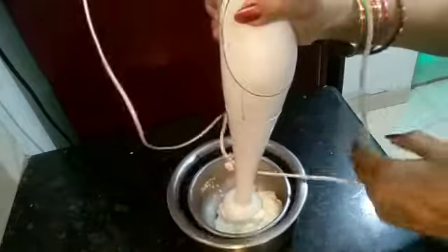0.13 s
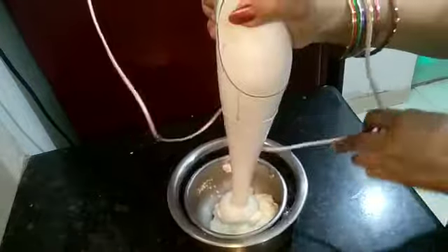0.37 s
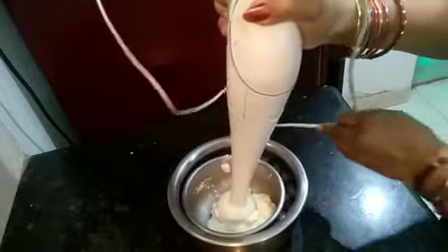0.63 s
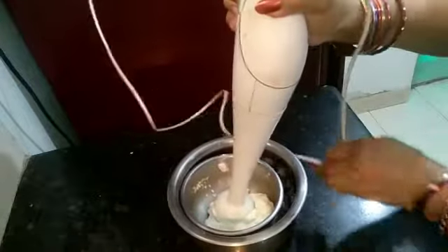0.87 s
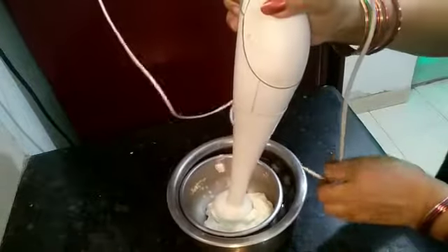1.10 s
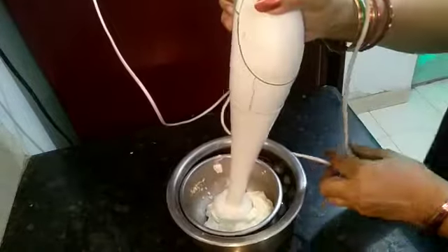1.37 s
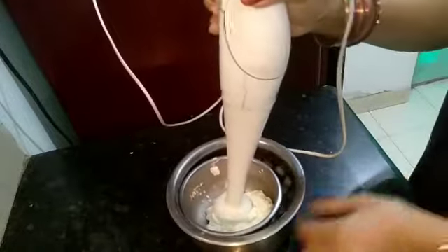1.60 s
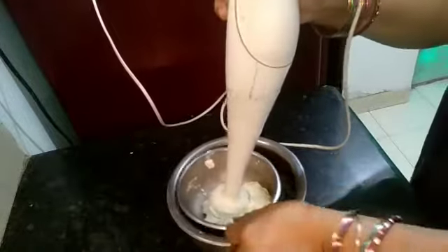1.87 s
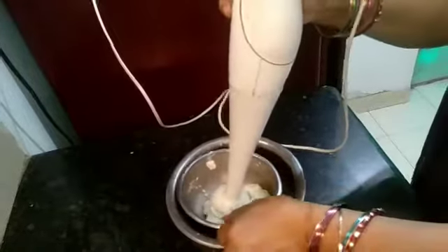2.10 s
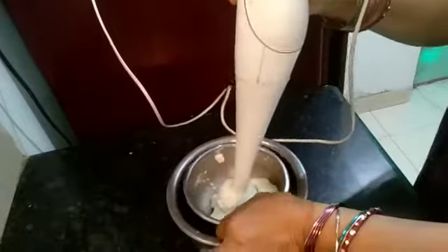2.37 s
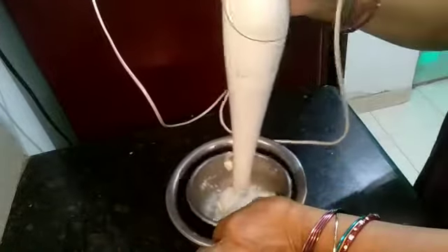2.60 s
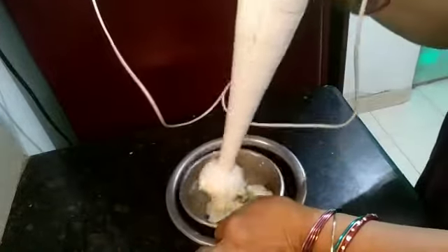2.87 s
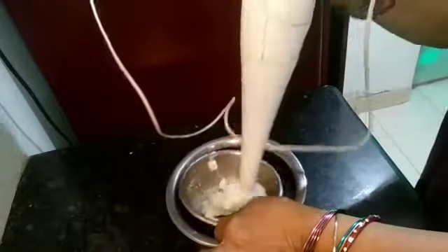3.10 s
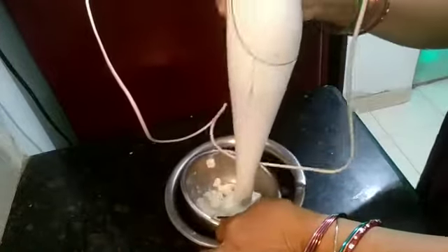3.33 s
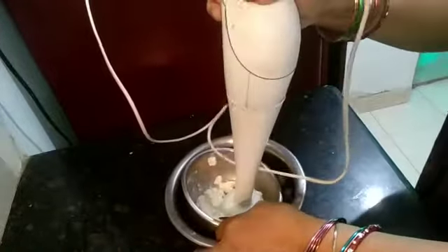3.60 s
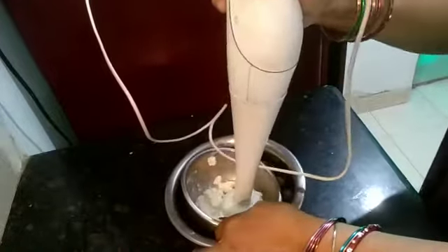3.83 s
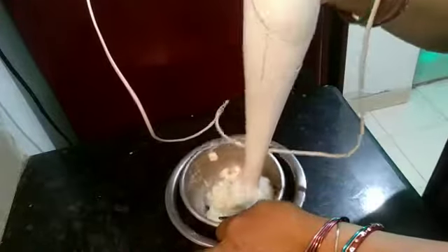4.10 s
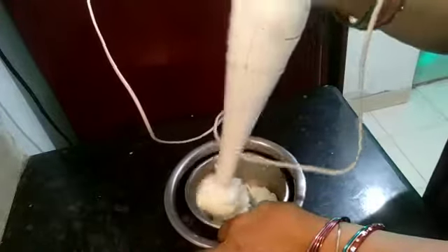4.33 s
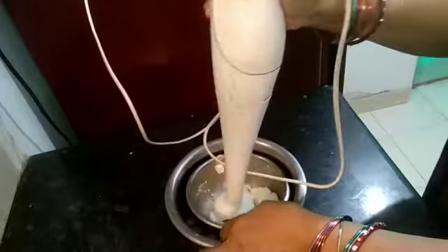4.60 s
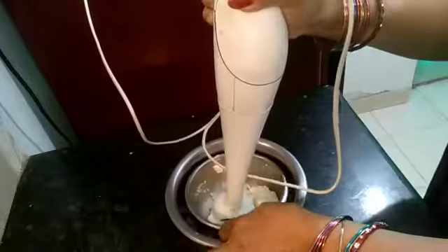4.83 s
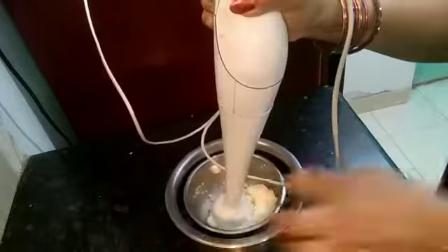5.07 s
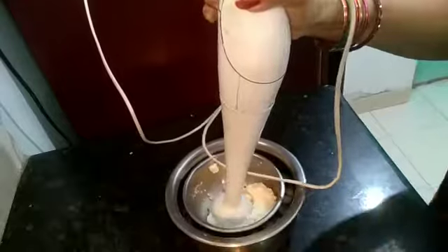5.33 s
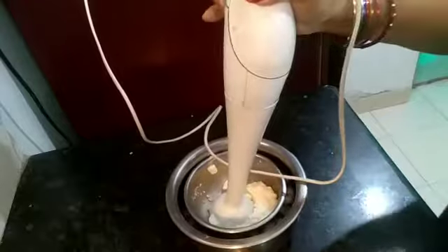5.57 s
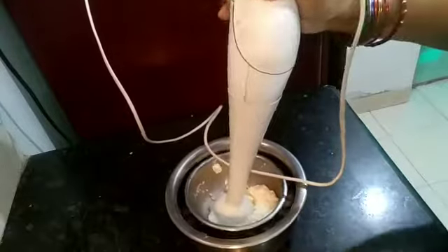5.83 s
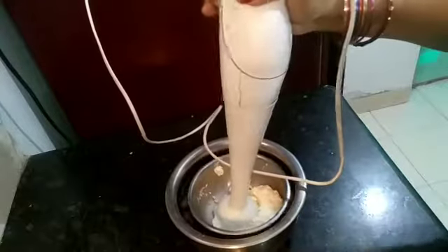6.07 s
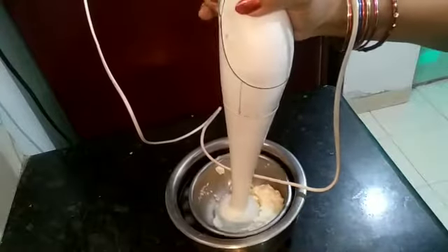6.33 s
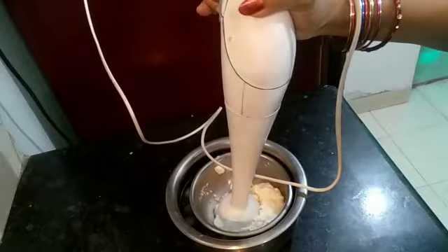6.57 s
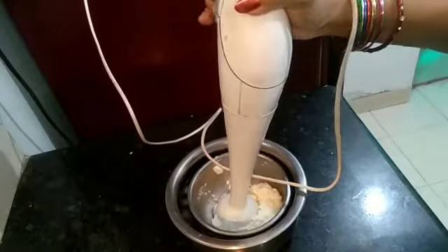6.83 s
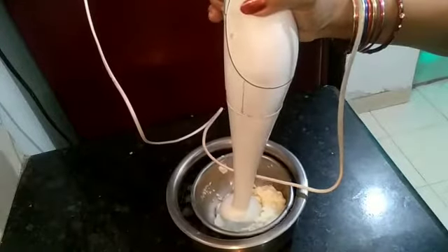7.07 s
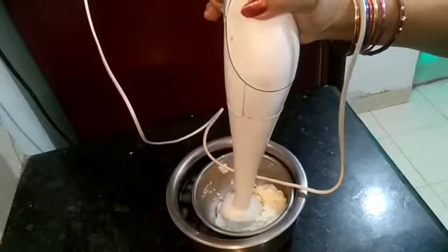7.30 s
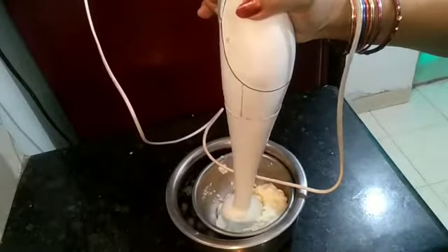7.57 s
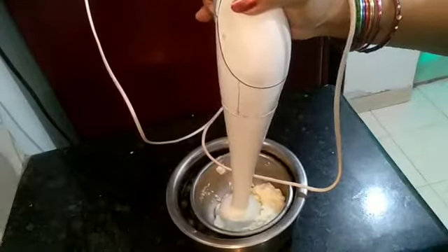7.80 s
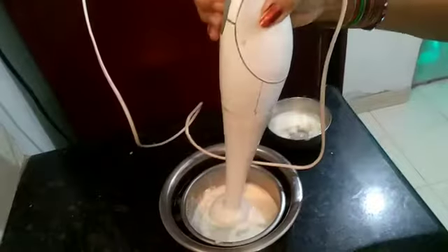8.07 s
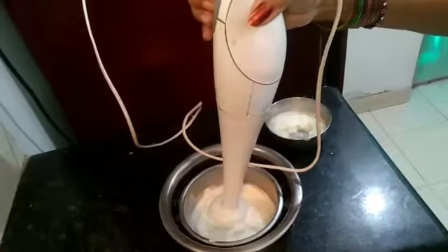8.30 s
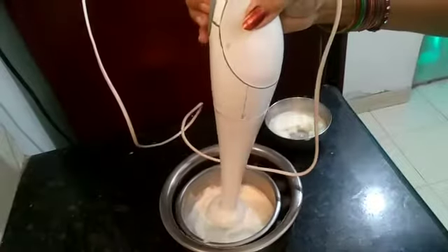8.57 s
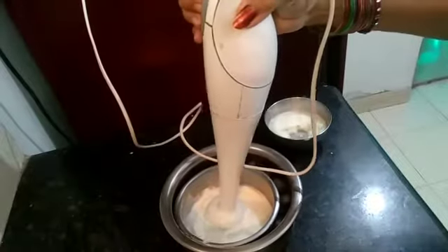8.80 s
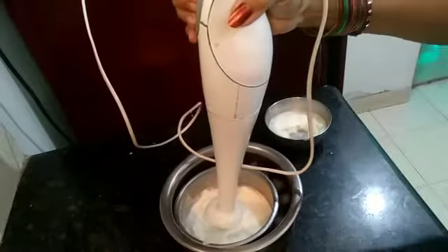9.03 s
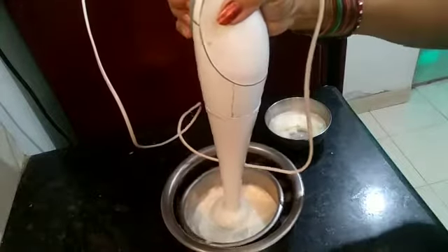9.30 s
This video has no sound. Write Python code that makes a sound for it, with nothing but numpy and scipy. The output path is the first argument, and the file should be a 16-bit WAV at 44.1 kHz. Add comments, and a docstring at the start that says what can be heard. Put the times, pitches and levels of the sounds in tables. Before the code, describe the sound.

In a small, hard-walled kitchen, a handheld blender runs in a long opening burst, then several bursts of about half a second, each snapping up to a buzzing whine and gliding down. Between them its head knocks and rattles in a steel bowl, hands and cord rustle, and bangles clink. The last burst is weaker and lower. Close stereo microphone, left side brighter, faint low room hum.

```python
"""Hand blender in short bursts

A hand-held blender in a steel bowl on a kitchen counter: shaft orders and rush follow a speed that rises, dips, runs down.
Contacts crack, rattle and excite damped bowl modes; glass bangles ring in sine modes; sliding is grainy noise.
Below lie coloured room noise and two wavering low tones. Two microphone ports hear it, the left one brighter.
"""
import sys
import numpy as np
from scipy import signal
from scipy.fft import rfft, irfft, next_fast_len
from scipy.io import wavfile
from scipy.ndimage import uniform_filter1d, map_coordinates

SR = 44100
rng = np.random.default_rng(int(sys.argv[2]) if len(sys.argv) > 2 else 0)


def transcribe(u):
    """Save the signal u as a 16-bit wav file named by the first command-line argument.

    u: samples, shape (n,) or (channels, n), limited to [-1, 1]; the rate is SR.
    q: integer samples, one column per channel.
    """
    v = np.clip(np.atleast_2d(u).T, -1, 1)
    q = np.round(v * 32767).astype(np.int16)
    wavfile.write(sys.argv[1], SR, q)


def undo_db(level):
    """Turn decibels back into plain size, where 20 dB means ten times bigger."""
    steps = np.asarray(level, float) / 20
    return 10 ** steps


N = 415422

# motor bursts: on/s, off/s, top speed/Hz, slow share of speed gain/1, run-down time constant/s
BURSTS = [(.093, 1.248, 218.3, 0.09, 0.12), (3.343, 3.814, 233.2, 0.11, .135),
          (4.602, 5.383, 238.2, .19, 0.13), (5.904, 6.43, 235.4, .05, .14), (6.926, 7.34, 238.4, 0.06, .14),
          (9.138, 9.502, 122.2, 0.06, .13)]
# left-right likeness of near sources: f/Hz, likeness/1
NEAR_LIKENESS = [(60, 0.67), (240, 1), (950, 0.31), (3770, 0.54), (15000, -0.004)]
# left-right likeness of room and rustle: f/Hz, likeness/1
FAR_LIKENESS = [(60, 1), (240, 0.85), (950, -0.19), (3770, 0.18), (15000, -2.3)]
# colour of a hard contact: f/Hz, level/dB
CRACK_COLOUR = [(350, -47.5), (600, -16.5), (1110, -12.5), (1490, -1), (2120, -15), (2650, 1.5), (10600, 0),
                (14500, -2), (16000, -36.5)]


def unit(x):
    """Scaled to rms 1."""
    return x / np.sqrt(np.mean(x ** 2) + 1e-20)


def along(points, hz):
    """(Hz, value) points interpolated on a log frequency axis."""
    f, v = np.transpose(points)
    return np.interp(np.log(hz + 1), np.log(f + 1), v)


def wobble(rate, channels=1):
    """Smooth random curves, rate knots a second."""
    knots = rng.standard_normal((channels, 4000))
    return np.array([map_coordinates(k, [np.arange(N) * rate / SR]) for k in knots])


def filtered(x, response):
    """x times a response of frequency."""
    m = next_fast_len(N + SR // 2)
    return irfft(rfft(x, m) * response(np.fft.rfftfreq(m, 1 / SR)), m)[..., :N]


def pair(alike):
    """White stereo noise of a given left-right likeness, mixed from mid and side."""
    turn = lambda hz: np.arccos(np.clip(along(alike, hz), -1, 1)) / 2
    noise = rng.standard_normal((2, N))
    mid, side = filtered(noise, lambda hz: [np.cos(turn(hz)), np.sin(turn(hz))])
    return np.array([mid + side, mid - side])


def coloured(x, spectrum):
    """x with the colour of (Hz, dB) points, rms 1."""
    return unit(filtered(x, lambda hz: undo_db(along(spectrum, hz))))


def resonance(f, centre_hz, width_hz):
    """Bell of height 1 with the given width at half height."""
    return 1 / (1 + (2 * (f - centre_hz) / width_hz) ** 2)


def notched_rippled(x, ripple_db, notch_db):
    """A moving notch from the counter's reflection, and random slowly changing ripples across the spectrum."""
    # notch path: t/s, f/Hz
    notch_path = [(.1, 8600), (.4, 8400), (1.3, 8400), (3.4, 9750), (4.7, 9300), (5.4, 9783), (6, 9100),
                  (6.4, 9597), (7.3, 9310)]
    hz, t, z = signal.stft(x, SR, nperseg=1024)
    field = uniform_filter1d(rng.standard_normal(z.shape), size=5, axis=1)
    field = uniform_filter1d(field, size=12, axis=2)
    notch_hz = np.interp(t, *np.transpose(notch_path))
    notch = notch_db * resonance(hz[:, None], notch_hz, 900)
    return signal.istft(z * undo_db(ripple_db * unit(field) - notch), SR, nperseg=1024)[1][:, :N]


def speed():
    """Shaft speed/Hz: fast and slow rise, load dips, exponential run-down; also burst index, age/s, time since off/s."""
    # blades bog down in thick food: t/s, speed lost/Hz, time to lowest speed/s
    bogs = [(0.984, 31, .045), (5.064, 7.7, 0.044), (6.205, 6.91, 0.0306)]
    spin_up_s, creep_s = .04, .2  # time constants
    t = np.arange(N) / SR
    on, off, top, slow, coast_s = np.transpose(BURSTS)
    which = np.clip(np.searchsorted(on, t) - 1, 0, None)
    age = np.clip(t - on[which], 0, None)
    driven = np.minimum(age, (off - on)[which])
    coasting = np.clip(t - off[which], 0, None)
    fast_lack = (1 - slow[which]) * np.exp(-driven / spin_up_s)
    slow_lack = slow[which] * np.exp(-driven / creep_s)
    hz = top[which] * (1 - fast_lack - slow_lack)
    for s, lost, deepest in bogs:
        u = np.clip((t - coasting - s) / deepest, 0, None)
        hz = hz - lost * u * np.exp(1 - u)
    return np.clip(hz * np.exp(-coasting / coast_s[which]), 1, None), which, age, coasting


def motor():
    """Shaft orders, throbbing with the mains torque, over a rush that bursts once a turn; a rattle as it coasts."""
    # voice per burst: rush/dB, brightness/dB, first order/dB, second order/dB, upper orders/dB
    voice = [(-31, 2.5, -34.5, -36, -39.5), (-30.5, 3, -33.5, -31, -31), (-31.5, 2, -33.5, -36.5, -34.5),
             (-31, 4.5, -31.5, -34.5, -30), (-30, 2, -32, -34, -33), (-39, -2, -40, -36.5, -47.5)]
    # roughness per burst: once-a-turn beat/dB, mains throb/1, coasting rattle/dB (all relative)
    rough = [(3, 0, -68), (3.5, 0.13, -46), (2.5, 0.03, -41), (3.5, 0, -35.5), (4, 0, -37), (.5, .07, -95)]
    # shaft orders: multiple/1, level/dB
    orders = [(1, 1), (2, -8.5), (3, -6.5), (4, -9), (5, -13), (6, -8.5), (8, -13.5)]
    # first order against speed: speed/Hz, level/dB
    first_curve = [(60, -54), (105, -15), (160, -4), (198, 1.5), (225, -2.5), (238, 1.5)]
    # second and upper orders against speed: speed/Hz, level/dB
    upper_curve = [(60, -47), (120, -9), (180, -9.5), (200, -4), (222, -3.5), (238, 1)]
    # rush against speed: speed/Hz, level/dB
    flow = [(25, -52), (60, -29.5), (100, -15.5), (140, -6.5), (200, -2), (238, 0)]
    # single orders swell or sink as the blades bite: t/s, order/1, level/dB, half length/s
    bites = [(0.918, 4, 16.5, 0.067), (1.185, 4, 10, 0.032), (3.427, 6, 11.5, .04), (3.44, 5, 7, .05),
             (3.762, 4, 4, .08), (5.322, 1, 3, 0.076), (5.32, 6, 3.5, 0.11), (6.139, 6, 4.5, 0.077),
             (6.24, 1, -1.5, .03), (6.392, 6, 7.5, 0.063), (7.289, 1, 2.5, .07), (7.239, 6, 2, 0.088)]
    # phase lead of the left port: f/Hz, lead/rad
    lead = [(230, -0.41), (460, -0.34), (700, -1.3), (930, 1.87), (1400, -0.98)]
    # colour of brush, fan and blade rush: f/Hz, level/dB
    rush_colour = [(150, -29), (250, -18), (273, -19), (348, -25.5), (444, -20.5), (510, -20.5),
                   (1820, -9.5), (3280, -11), (3840, -10.5), (4650, -12), (5070, -16.5), (5730, -7),
                   (10500, -7), (14200, -18.5), (16000, -43)]
    # body and bowl resonances: f/Hz, width/Hz, level/dB
    body_modes = [(340, 67, 4.5), (559, 53, 11.5), (970, 96, 7.5), (1412, 13, 5.5), (1570, 59, 1.5),
                  (1860, 150, 3.5), (3044, 280, -4.5), (3720, 280, 2.5), (5070, 110, -6.5),
                  (6440, 390, 0.5), (7190, 230, 2)]
    mains_hz, full_hz, bright_db_per_oct = 50, 230, 4
    wake_db, wake_s, rush_wake_db, rush_wake_s = 23, 0.047, 10, 0.028  # starts this far down, recovers
    unload_db, unload_upper_db, unload_s = 6, 11, 0.011  # whine drop without current

    hz, which, age, coasting = speed()
    t = np.arange(N) / SR
    rush_db, bright_db, first_db, second_db, upper_db = np.array(voice)[which].T
    wake = wake_db * np.exp(-age / wake_s)
    unload = 1 - np.exp(-coasting / unload_s)
    rush_db = rush_db + along(flow, hz) - rush_wake_db * np.exp(-age / rush_wake_s)
    bright_db = bright_db + bright_db_per_oct * np.maximum(np.log2(hz / full_hz), -1)
    upper = along(upper_curve, hz) - wake - unload_upper_db * unload
    first = along(first_curve, hz) - wake - unload_db * unload
    level = {1: first_db + first, 2: second_db + upper}

    gate = uniform_filter1d(1. * (hz > 20), size=1300)
    turn = 2 * np.pi * np.cumsum(hz * (1 + .0012 * wobble(40)[0])) / SR
    on = np.array([uniform_filter1d(1. * ((t > a) & (t < b)), size=1300) for a, b, *_ in BURSTS])
    off = np.array(BURSTS)[:, 1]
    beat_db, depth, coast_db = np.transpose(rough)
    beat = 3.0 + (beat_db - 4.5) @ on
    mains = depth @ on * np.cos(4 * np.pi * mains_hz * t)  # torque at twice the mains

    whine = np.zeros((2, N))
    for k, db in orders:
        half_lead = along(lead, k * 230) / 2 * np.array([[1], [-1]])
        flutter_db = .5 * wobble(7) + .25 * wobble(10, channels=2)
        unsteady = undo_db(min(k - .6, 3) * flutter_db)  # higher orders flutter more
        bite_db = sum(g * np.exp(-((t - s) / half_s) ** 2) for s, order, g, half_s in bites if round(order) == k)
        strength = undo_db(db + bite_db + level.get(k, upper_db + upper)) * unsteady
        throb = 1 + (k - .7) * mains
        whine += strength * throb * np.sqrt(2) * np.cos(k * turn + half_lead + 0.94 * k * (k > 1))

    body = lambda f: undo_db(sum(db * resonance(f, c, w) for c, w, db in body_modes))
    # blades and brushes strike once a turn, at random strength
    strike = rng.standard_normal(8000)[(turn / (2 * np.pi)).astype(int)]
    turn_db = (beat + 0.3 * strike) * np.cos(turn) + 1.3 * np.cos(2 * turn)
    gated = pair(NEAR_LIKENESS) * undo_db(turn_db + 9.7 * mains + 0.74 * wobble(25))
    rush = filtered(gated, lambda f: undo_db(along(rush_colour, f)) * body(f))
    rush = notched_rippled(rush, ripple_db=2.1, notch_db=9)
    top = lambda f: 1 / (1 + (5200 / (f + 1)) ** 12)  # split at 5200 Hz
    low = unit(filtered(rush, lambda f: 1 - top(f)))
    high = unit(filtered(rush, top))
    rush = undo_db(rush_db + 0.5) * low + undo_db(rush_db + bright_db - 0.5) * high

    # the unloaded coupling chatters in the shell on the way down
    swell = undo_db(coast_db) @ np.exp(-((t - off[:, None] - .045) / 0.056) ** 2)
    coast = swell * unit(filtered(gated, lambda f: resonance(f, 1600, 300)))
    return gate * (filtered(whine, body) + rush + coast)


def burst(t, t60):
    """A crack, then a rattle dying out."""
    crack = undo_db(-60 * t / 0.012)
    rattle = 0.47 * undo_db(-60 * t / max(t60, .02))
    return (crack + rattle) * (1 - np.exp(-t / 0.00088))


def knocks():
    """Each contact of blender, bowl or cord cracks, rattles and excites the damped bowl."""
    # contacts: t/s, level/dB before trim, bowl over contact/dB before trim, rattle t60/s (at least 0.02)
    contacts = [(0.1175, -23.5, -20, 0.18), (1.693, -30, -27, 0.051), (1.759, -35.5, -2, 0.084),
                (1.786, -14.5, -16.5, 0.07), (1.8712, -26, -6, 0.11), (2.13, -36.5, 4, 0.11),
                (2.161, -32.5, -23, 0.09), (2.324, -35.5, -3, 0.22), (2.389, -35.5, -11, 0.18),
                (2.4667, -38, -7.5, 0.11), (2.539, -36, -25, 0.096), (2.602, -43.5, -8, 0.3),
                (2.645, -45, 4, 0.13), (2.679, -29, -4, 0.11), (2.7155, -37.5, 8, 0.068),
                (2.7394, -37.5, -16, 0.33), (2.787, -54, 6, 0.16), (2.825, -33, -9, 0.083),
                (2.8746, -31.5, -7, 0.16), (2.9856, -33, -19, 0.3), (3.0955, -20.5, -7.5, 0.11),
                (3.3322, -31, -1, 0.27), (3.356, -19.5, -4.5, 0.33), (4.1868, -29, -9, 0.19),
                (4.203, -32.5, -13, 0.1), (4.23, -32, -9.5, 0.15), (4.321, -36, -15.5, 0.049),
                (4.415, -40, -3.5, 0.052), (4.432, -40.5, -16, 0.13), (4.469, -41, -21, 0.08),
                (4.603, -37, -5.5, 0.087), (4.614, -27, -1.5, 0.12), (6.9524, -43.5, -15, 0.098),
                (7.6097, -43, -19, 0.083), (7.6465, -36, -22, 0.1), (8.1427, -49, 0, 0.1),
                (9.143, -32.5, -24, 0.16), (9.2803, -31, -28, 0.13)]
    # bowl modes: f/Hz, width/Hz, level/dB
    bowl_modes = [(577, 34, -2.5), (1012, 160, -9), (1363, 46, 5), (1486, 36, 4), (1850, 160, -2)]
    t = np.arange(SR // 2) / SR
    strike, thump = np.zeros(N + SR), np.zeros(N + SR)
    for s, db, bowl_db, t60 in contacts:
        start = round(s * SR)
        strike[start:][:len(t)] += undo_db(db - 7.5) * burst(t, t60)
        thump[start:][:len(t)] += undo_db(db + bowl_db + 12.0) * burst(t, t60)

    def bowl(f):
        """Damped resonators of alternating sign."""
        return sum((-1) ** k * undo_db(db) * 1j * f * w / (c * c - f * f + 1j * f * w)
                   for k, (c, w, db) in enumerate(bowl_modes))

    cracks = strike[:N] * coloured(pair(NEAR_LIKENESS), CRACK_COLOUR) * undo_db(2.9 * wobble(330))
    return cracks + filtered(thump[:N] * pair(NEAR_LIKENESS), bowl)


def clinks():
    """Glass bangles meet: a noise tick and decaying sine modes at new strengths and slightly new pitch."""
    # meetings: t/s, level/dB before trim, ring over tick/dB before trim
    meetings = [(.0338, -18, -32), (5.655, -50, -8), (5.781, -46, -14), (5.8495, -25, -28),
                (6.7261, -47, -12), (7.7045, -34, -27), (8.528, -39, -30), (8.8223, -46, -18),
                (8.864, -45, -26), (9.176, -26, -15), (9.2249, -28, -26), (9.3447, -31, -24)]
    # bangle modes: f/Hz, level/dB, t60/s
    bangle_modes = [(2460, 0, .2), (3590, 2, .03), (3950, 2, .03), (4500, -2, .03)]
    t = np.arange(SR // 2) / SR
    tick, rings = np.zeros(N + SR), np.zeros(N + SR)
    for s, db, ring_db in meetings:
        start = round(s * SR)
        tick[start:][:len(t)] += undo_db(db - 6) * burst(t, 0.13)
        modes = np.zeros(len(t))
        for hz, g, t60 in bangle_modes:
            a, b = rng.standard_normal(2)
            modes += undo_db(g + 2 * a - 60 * t / t60) * np.sin(2 * np.pi * hz * (1 + .003 * b) * t)
        rings[start:][:len(t)] += undo_db(db + ring_db) * modes * (1 - np.exp(-t / 0.00089))
    ticks = tick[:N] * coloured(pair(NEAR_LIKENESS), CRACK_COLOUR)
    return ticks + rings[:N] * undo_db(3 * wobble(60, channels=2))


def rustle():
    """Hands, cord and bowl slide: noise in uneven grains, with chance ticks that die out quickly."""
    # slides: loudest at t/s, level/dB before trim, fade-in/(dB/s), fade-out/(dB/s)
    slides = [(0, -43, 100, 35), (1.45, -56, 58, 15), (1.92, -49.5, 68, 39.5), (2.42, -56.5, 40, 4.5),
              (2.89, -53, 14, 53), (3.12, -45, 97, 88), (4.3, -51.5, 67, 33.5), (5.77, -64, 16.5, 21),
              (6.74, -72, 108, 101), (7.6, -64.5, 101, 75), (8.201, -72, 2.5, 11.5), (9.2, -76, 20, 10)]
    # sliding colour: f/Hz, level/dB
    slide_colour = [(530, -50.5), (900, -2.5), (1130, -43), (1360, 3), (1640, -3), (2570, 3.5), (10800, 0),
                    (16000, -14)]
    t = np.arange(N) / SR
    fades = [db - np.maximum(rise * (s - t), fall * (t - s)) for s, db, rise, fall in slides]
    level = np.max(fades, axis=0)
    when, size = rng.random((2, 420))
    kicks = np.bincount((when * N).astype(int), size ** 3, N)
    ticks = signal.fftconvolve(kicks, undo_db(-60 * np.arange(SR // 4) / SR / 0.048))[:N]
    uneven_db = 1.2 * wobble(10) + 1.3 * wobble(220) + 1.2 * wobble(40, channels=2)
    grains = (0.6 + ticks) * undo_db(uneven_db)
    noise = notched_rippled(coloured(pair(FAR_LIKENESS), slide_colour), ripple_db=2.4, notch_db=0)
    return undo_db(level + 1.5) * unit(noise * grains)


def walls(x):
    """Kitchen reverberation: noise whose every frequency dies at its own speed."""
    # decay: f/Hz, t60/s
    decay = [(200, 0.42), (2000, 0.27), (10000, 0.13)]
    hz, t, z = signal.stft(rng.standard_normal((2, SR // 2)), SR, nperseg=256)
    fade = undo_db(-60 * t / along(decay, hz)[:, None]) * (hz[:, None] > 300)
    tail = signal.istft(z * fade, SR, nperseg=256)[1]
    late = np.pad(x, ((0, 0), (300, 0)))  # 300 samples of delay
    return signal.fftconvolve(late, tail / np.linalg.norm(tail[0]), axes=1)[:, :N]


def kitchen():
    """Slowly drifting room noise with two wavering low tones made of narrow-band noise."""
    # low tones: f/Hz, width/Hz, level/dB
    tones = [(72.1, 23, -60.5), (144.2, 9.2, -62.5)]
    # room noise colour: f/Hz, level/dB
    room_colour = [(7.1, -43), (12, -5), (70, -1), (140, -4), (264, -10.5), (727, -10.5), (1940, -18),
                   (2910, -30.5), (3560, -28.5), (5190, -37.5), (12000, -35), (15600, -69.5), (22000, -120)]
    hum = np.zeros((2, N))
    for c, w, db in tones:
        hum += undo_db(db) * unit(filtered(pair(FAR_LIKENESS), lambda f: resonance(f, c, w)))
    room_db = -55.5 + wobble(3)
    return hum + undo_db(room_db) * coloured(pair(FAR_LIKENESS), room_colour)


def scene():
    """The blender and the hands near the ports, the walls answering, over rustle and room."""
    near, hands = motor(), knocks() + clinks()
    echo = walls(undo_db(-8.0) * near + undo_db(-5.5) * hands)
    return near + hands + echo + rustle() + kitchen()


def ports(dry):
    """Two microphone ports of different colour: opposite tilts of equal summed power."""
    # left minus right: f/Hz, level/dB
    difference = [(300, -0.1), (700, -3), (1300, 0), (4400, -2), (8100, 10), (13000, 18.5)]
    tilt = lambda hz: undo_db(along(difference, hz) / 2)
    norm = lambda hz: np.sqrt((tilt(hz) ** 2 + tilt(hz) ** -2) / 2)
    return filtered(dry, lambda hz: [tilt(hz), 1 / tilt(hz)] / norm(hz))


def roll_off(x):
    """The treble ends steeply here."""
    return signal.sosfilt(signal.butter(12, 16460, fs=SR, output="sos"), x)


def record(dry):
    """The scene as the two ports pick it up."""
    mix = ports(dry)
    return roll_off(mix)


dry = scene()
out = record(dry)
transcribe(out)
```